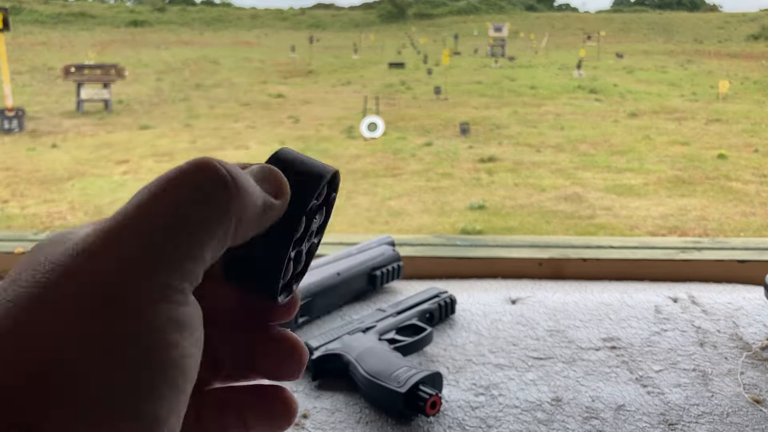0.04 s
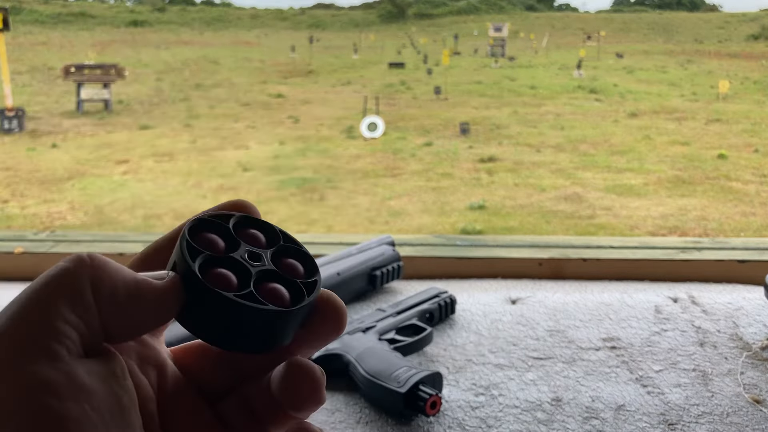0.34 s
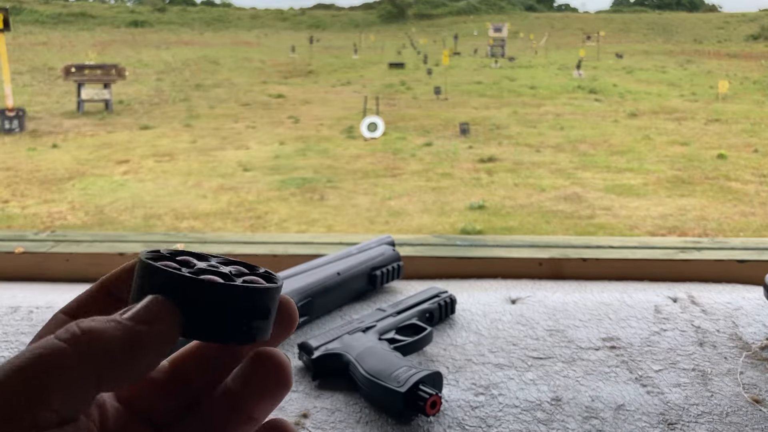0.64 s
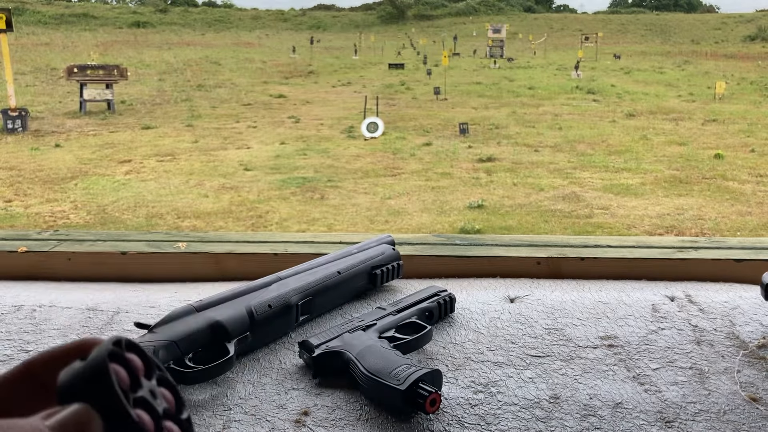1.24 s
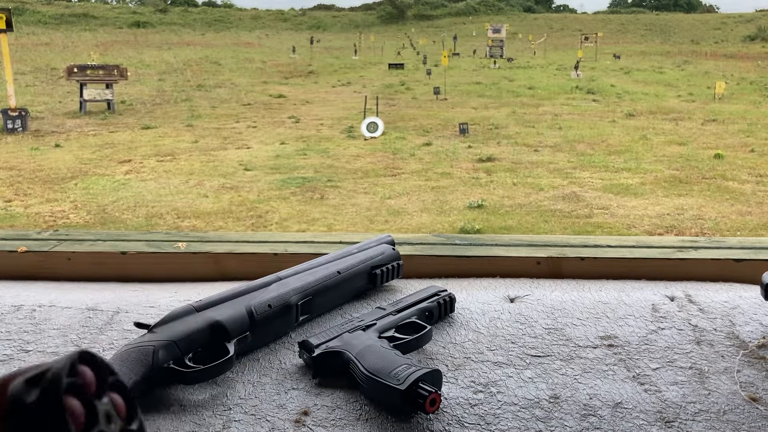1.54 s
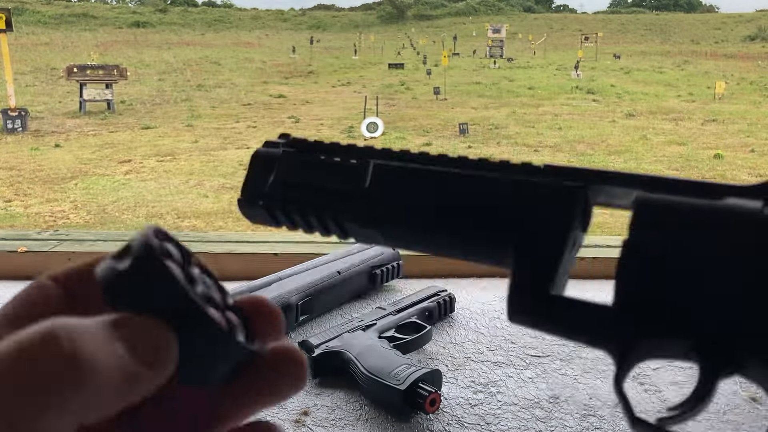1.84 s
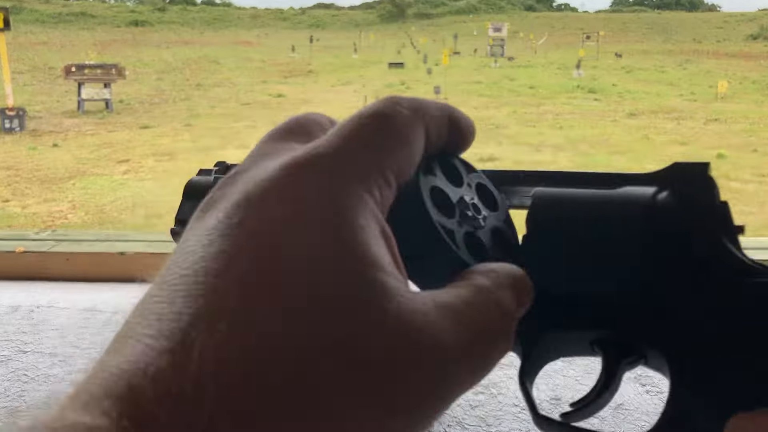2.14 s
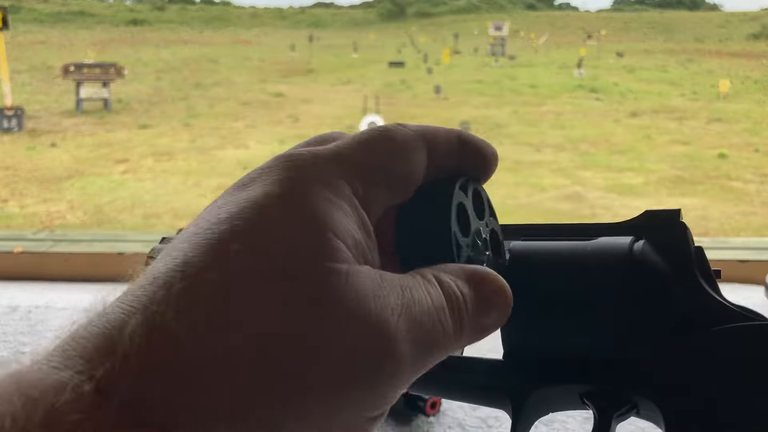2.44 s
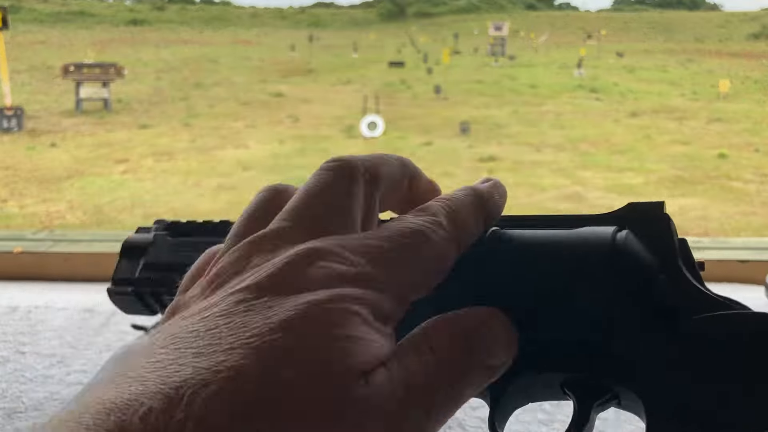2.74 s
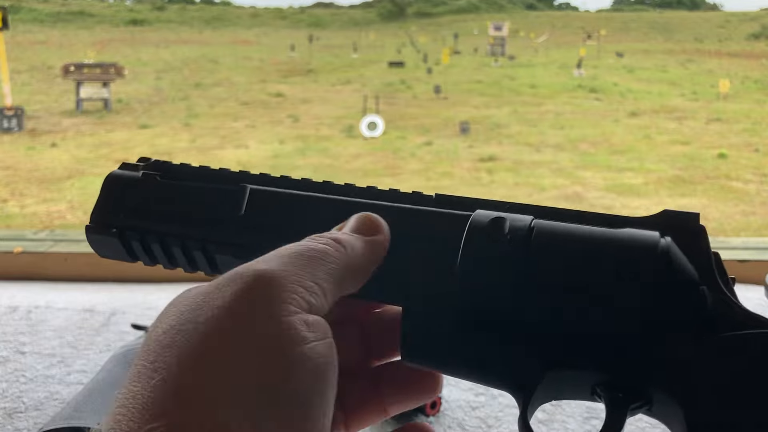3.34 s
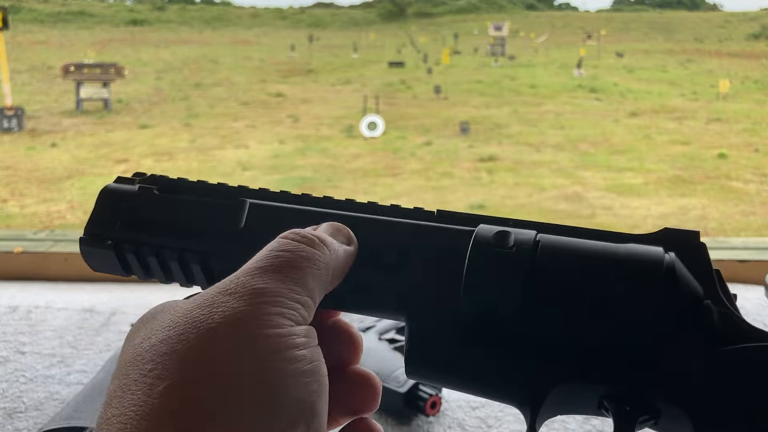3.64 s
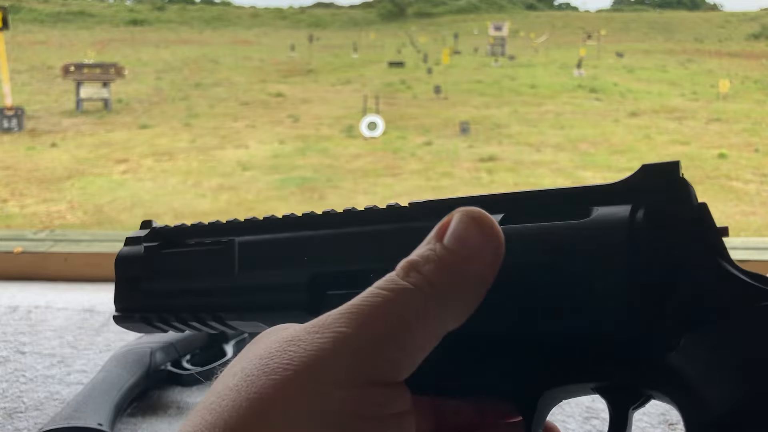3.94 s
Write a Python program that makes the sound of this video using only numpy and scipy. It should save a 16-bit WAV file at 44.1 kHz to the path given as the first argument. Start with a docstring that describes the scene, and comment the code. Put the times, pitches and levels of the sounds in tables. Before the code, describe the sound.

Close metallic clacks of a revolver being loaded at a sheltered outdoor range. First the gun rubs over carpet with dull bumps, then the cylinder rattles in and seats, and finally a latch snaps sharply. Faint wind touches the microphone.

```python
"""Revolver dragged off a range bench

Close up, a revolver rubs over the carpeted bench of a roofed outdoor range. Its loaded cylinder knocks
and scrapes into the frame and seats; a thumb slides along the barrel; a sprung latch snaps shut.
Blows are noise cracks plus damped modes; friction is many tiny slips over hiss.
The roof answers briefly; light wind bumps the microphone, birds chirp far off."""
import sys
import numpy as np
from scipy import signal
from scipy.fft import rfft, irfft
from scipy.io import wavfile
from scipy.ndimage import uniform_filter1d

SR = 44100
rng = np.random.default_rng(int(sys.argv[2]) if len(sys.argv) > 2 else 0)


def inscribe(sig):
    """Save sig as 16-bit PCM at rate SR to the path in sys.argv[1].

    A 1-D sig is mono; a 2-D sig holds one channel per row.
    Samples are clipped to [-1, 1] before scaling.
    """
    pcm = np.round(np.clip(np.atleast_2d(sig).T, -1, 1) * 32767)
    wavfile.write(sys.argv[1], SR, pcm.astype(np.int16))


N = 176400
BIN_HZ = np.fft.rfftfreq(N, 1 / SR)

# blow band centres: f/Hz
BANDS_HZ = [350, 750, 1400, 3000, 7000, 12000]
# blows: t/s, low and high f/Hz favoured by the contact point, level/dB per band
CYLINDER_KNOCKS = [(1.138, 1300, 1860, -86, -58, -53, -66, -71, -62),
                   (1.372, 725, 1340, -41, -64, -48, -90, -70, -70),
                   (2.1511, 898, 3020, -35.5, -19.5, -23, -20, -34, -43),
                   (2.2462, 810, 1570, -45.5, -40.5, -31.5, -35.5, -46, -45.5),
                   (2.3116, 1637, 4517, -57.5, -39, -34.5, -39.5, -52.5, -53),
                   (2.3248, 906, 1167, -51, -49, -41.5, -61, -68, -73),
                   (2.4208, 1110, 1210, -48.5, -33.5, -28.5, -41, -72, -71),
                   (2.5203, 1260, 1620, -64.5, -48.5, -31.5, -39.5, -46, -53),
                   (2.583, 950, 1740, -55.5, -46, -48.5, -60, -71, -76),
                   (2.6056, 910, 1780, -58, -35, -32, -38.5, -57.5, -48.5),
                   (2.6127, 610, 1300, -40, -33.5, -40, -45, -62.5, -47),
                   (2.6265, 1410, 2700, -47.5, -40, -37.5, -38, -56, -52.5),
                   (2.6342, 926, 3720, -50, -31, -26, -37, -48.5, -42.5),
                   (2.642, 674, 1052, -37, -20, -24.5, -38.5, -51, -46),
                   (2.7195, 840, 1580, -51.5, -38.5, -35.5, -47, -47.5, -44),
                   (2.7318, 886, 1540, -55.5, -28.5, -31, -33.5, -43, -46.5),
                   (2.7491, 1380, 7440, -55.5, -23.5, -21.5, -38, -24.5, -22),
                   (2.7528, 1283, 2895, -47, -35, -27.5, -17.5, -39, -32.5),
                   (3.091, 1280, 2640, -82, -43.5, -32, -39.5, -47, -36),
                   (3.0995, 1030, 2480, -67.5, -45.5, -35.5, -31.5, -78, -58),
                   (3.135, 910, 1406, -73, -62, -40, -60, -72, -55)]
LATCH_STRIKES = [(3.6598, 1520, 3780, -52, -34, -22, -21, -19, -21),
                 (3.6647, 1700, 2840, -48, -30, -22, -24, -22, -23),
                 (3.6692, 1600, 7730, -48, -38, -33, -31, -31, -38),
                 (3.6721, 1500, 2380, -46, -33, -24, -28, -26, -26),
                 (3.6745, 740, 1400, -38, -28, -30, -35, -44, -46),
                 (3.6875, 1460, 2060, -60, -50, -40, -45, -51, -50)]
# struck modes: f/Hz, level/dB, t60/s
FRAME_MODES = [(346, -3.5, 0.051), (636, -9.5, 0.061), (759, 5, 0.015), (1077, 4.5, 0.013),
               (1401, 0.5, 0.015), (1740, -9.5, 0.033), (2298, -6.5, .022), (3510, -7, 0.014),
               (4560, -7, 0.016), (7670, 1, 0.014), (10900, 1.5, 0.019)]
LATCH_MODES = [(740, -8, .022), (1350, -5, .02), (1521, -3, .02), (1695, -4, .02), (2062, -3, .025),
               (2383, -5, .025), (6563, -6, .014), (7736, -2, .02), (9400, -1, .014), (10600, -3, .016)]
# rubbed modes: f/Hz, width/Hz, level/dB
BOARD_MODES = [(143, 43, -9), (208, 35, 3), (318, 72, -2.5), (532, 11, 0.5)]
RASP_MODES = [(1702, 270, -11.5), (3920, 520, 2.5), (4500, 240, -8.5)]
# envelopes: t/s, level/dB
SCRAPE_ENV_DB = [(2.13, -74), (2.16, -39.5), (2.23, -57), (2.27, -45.5), (2.32, -65.5), (2.4, -63.5),
                 (2.415, -45), (2.46, -49), (2.483, -41.5), (2.495, -52), (2.515, -34), (2.535, -53.5),
                 (2.57, -58), (2.60, -44), (2.62, -53), (2.635, -30), (2.67, -36.5), (2.695, -51),
                 (2.715, -46), (2.755, -24), (2.78, -45), (2.895, -69), (2.905, -47.5), (2.97, -70),
                 (3.075, -67), (3.1, -31.5), (3.125, -49), (3.165, -53), (3.195, -46.5), (3.23, -58),
                 (3.3, -64), (3.62, -62.5), (3.649, -52.5), (3.657, -23), (3.68, -51)]
CARPET_ENV_DB = [(.91, -89), (.955, -62.5), (1.0, -56), (1.06, -51), (1.11, -72), (1.16, -58.5),
                 (1.205, -60.5), (1.215, -46), (1.235, -48.5), (1.255, -65.5), (1.277, -68), (1.285, -46),
                 (1.325, -48.5), (1.36, -40), (1.46, -43.5), (1.56, -51), (1.61, -58.5), (1.65, -50),
                 (1.70, -49.5), (1.76, -62), (1.83, -78), (1.89, -66), (2.02, -78)]
BOARD_ENV_DB = [(.95, -83), (1.02, -56), (1.12, -72.5), (1.27, -57), (1.35, -45), (1.5, -52), (1.8, -75)]
RASP_ENV_DB = [(.45, -88), (.54, -71.5), (.62, -89), (.92, -79), (0.999, -51), (1.06, -56.5), (1.12, -86)]
WIND_ENV_DB = [(0, -40), (.055, -48), (.12, -46.5), (.21, -69), (.47, -55), (.58, -65.5), (.65, -59),
               (.75, -66.5), (1.2, -61.5), (1.38, -45.5), (1.82, -61.5), (2.1, -53.5), (2.45, -59),
               (3.1, -55), (3.22, -61.5), (3.65, -63), (3.77, -86), (4, -61)]
AIR_ENV_DB = [(0, -68.5), (.3, -65), (.5, -72), (.85, -78), (1.4, -62.5), (2.05, -66), (3.05, -62.5),
              (3.25, -58), (3.62, -65), (3.8, -75), (4, -67.5)]
# noise spectra: f/Hz, relative density/dB
SCRAPE_SPECTRUM = [(60, -16.5), (250, -12), (500, -7), (900, 2.5), (1500, 3.5), (2500, -2), (4000, -3),
                   (5500, -14), (8000, -14.5), (11000, -12), (15500, -29), (16500, -46.5)]
CARPET_SPECTRUM = [(40, -5), (120, -4.5), (250, -2), (500, -22.5), (900, -4.5), (1500, -7), (2500, -10.5),
                   (4000, -7.5), (5500, -10.5), (8000, -9.5), (11000, -10), (15500, -16), (16500, -16.5)]
SKIN_SPECTRUM = [(100, -19.5), (500, -16), (1500, 0.5), (2500, -2), (4000, -1), (6000, -3), (8000, -0.5),
                 (11000, 8.5), (15500, 1.5), (16500, -38.5)]
WIND_SPECTRUM = [(15, -22.5), (28, -13.5), (50, 5.5), (90, 2.5), (140, -8.5), (220, -21.5), (450, -44.5),
                 (1500, -51)]
AIR_SPECTRUM = [(30, 5.5), (250, 2), (480, -0.5), (750, -7.5), (1130, -5.5), (1400, -12), (1900, -7.5),
                (2500, -15.5), (3900, -18), (4500, -11), (5400, -27.5), (16000, -24.5)]
# skin on cylinder and barrel: t/s, rise/s, hold/s, release/s, level/dB
THUMB_STROKES = [(0.205, 0.026, 0.0083, 0.018, -74.5), (0.511, 0.016, 0.0073, 0.026, -74),
                 (1.618, 0.027, 0.028, 0.14, -58.5), (3.261, 0.056, 0.029, 0.12, -48.5),
                 (3.42, 0.079, 0.31, 0.043, -72.5), (3.842, 0.12, 0.012, 0.14, -49.5)]
# snags: t/s, relative level/dB
SNAGS = [(.334, -69), (.949, -56), (.9945, -44), (1.138, -51), (1.2805, -45), (1.349, -43), (2.9015, -55),
         (3.0875, -46)]
# hand and grip thuds: t/s, f/Hz, level/dB, t60/s
BUMPS = [(1.282, 81, -31, 0.19), (1.345, 224, -36, 0.22), (1.366, 98.4, -44, 0.26),
         (2.901, 323, -37.5, 0.12), (2.935, 187, -43, 0.23), (3.097, 123, -24.5, 0.047)]
# bird chirps: t/s, start f/Hz, level/dB
CHIRPS = [(.445, 2170, -79), (.865, 2120, -82), (2.822, 2490, -62)]
# hand, bench and roof echoes: delay/s, level/dB
ECHOES = [(.0024, -17.5), (.0088, -24), (0.0161, -32.5), (0.036, -29)]
# diffuse tail: f/Hz, t60/s
TAIL_T60_S = [(200, 0.1), (1000, 0.4), (4000, 0.33), (12000, .22)]
# stereo side against mid: f/Hz, level/dB
SIDE_DB = [(40, -10), (150, -14), (600, -3), (1500, -3), (3000, 3.5), (5000, 3), (7000, -6.5), (16000, -56)]
# left microphone's phase lead: f/Hz, phase/rad
LEFT_LEAD_RAD = [(0, 0), (3500, .4), (7400, -.1), (9000, -3.1), (13700, -9.4), (15300, -12.6)]
# left boost and equal right cut: f/Hz, level/dB
TILT_DB = [(100, 0), (700, -.4), (1400, 1.5), (3000, .5), (6000, -.5), (14000, 0)]


def blow(focus_hz, band_db, modes, crack_db, crack_s, onset, size=4096):
    """A contact crack, the modes it rings and loose parts chattering; the contact weights each band."""
    spread_db = 5.5  # each blow lands elsewhere on the body
    chatter_db, focus_gain, focus_q = -17, 1.7, 7
    t = np.arange(size - onset) / SR
    ring = unit(sum(amp(db + rng.normal(0, spread_db) - 60 * t / t60) * np.sin(2 * np.pi * hz * t)
                    for hz, db, t60 in modes))
    crack = amp(crack_db) * burst(t, crack_s)
    chatter = amp(chatter_db) * burst(t, decay_s=0.008)
    z = rfft(np.pad(ring + crack + chatter, ((0, 0), (onset, 0))))
    hz = np.fft.rfftfreq(size, 1 / SR)
    z *= hz ** 2 / (hz ** 2 + 220 ** 2) / (1 + (hz / 14500) ** 8)  # band-pass
    z *= 1 + sum(focus_gain / (1 + 1j * focus_q * (hz / f - f / (hz + 1))) for f in focus_hz)
    masks = [log_interp(list(zip(BANDS_HZ, one)), hz) for one in np.eye(len(BANDS_HZ))]
    bands = (amp(db) * unit(irfft(z * mask)) for db, mask in zip(band_db, masks))
    return sum(bands) * np.sqrt(.005 * SR)  # band levels as rms over 5 ms


def blows(rows, modes, crack_db, crack_s):
    """A series of blows on one steel body."""
    out, onset = np.zeros((2, N)), 256  # samples of room for filter pre-ring
    for s, low_hz, high_hz, *band_db in rows:
        add(out, s - onset / SR, blow((low_hz, high_hz), band_db, modes, crack_db, crack_s, onset))
    return out


def cylinder_scrape():
    """The cylinder slips along the frame."""
    rub = friction(SCRAPE_SPECTRUM, slips_per_s=990, spread_db=-1, hiss=1.0, flutter_db=1.6)
    return envelope(SCRAPE_ENV_DB) * rub


def bench_drag():
    """The gun rubs the carpet; boards resonate below, hard edges rasp on skin and pile."""
    rub = friction(CARPET_SPECTRUM, slips_per_s=2600, spread_db=1.5, hiss=.75, flutter_db=1.0)
    boards = rubbed_modes(BOARD_MODES, BOARD_ENV_DB)
    rasp = rubbed_modes(RASP_MODES, RASP_ENV_DB)
    return envelope(CARPET_ENV_DB) * rub + boards + rasp


def friction(spectrum, slips_per_s, spread_db, hiss, flutter_db):
    """Tiny unequal slips over smooth hiss, clumping as the pressure varies."""
    slipping = rng.random(N) < slips_per_s / SR
    sizes = amp(spread_db * np.minimum(rng.exponential(1, N), 4))
    slips = unit(slipping * sizes * noise(N))
    pressure = amp(flutter_db * wander(N, size=200))
    rub = (slips + hiss * unit(noise(N))) * pressure
    return flicker(coloured(rub, spectrum), depth_db=2.4)


def rubbed_modes(modes, env_db, slips_per_s=900):
    """Small slips keep a few resonances sounding."""
    slips = (rng.random(N) < slips_per_s / SR) * noise(N)
    body = sum(amp(db) / (1 + 1j * (BIN_HZ ** 2 - hz ** 2) / (width_hz * (BIN_HZ + 1)))
               for hz, width_hz, db in modes)
    return envelope(env_db) * unit(irfft(rfft(stereo(slips)) * body, N)) * np.sqrt(N)


def squeak(at_s=1.211, length_s=0.022, start_hz=929, rise_hz_per_s=6500, level_db=-48.5):
    """Stick-slip: one rising chirp as the gun starts to move."""
    out, t = np.zeros((2, N)), np.arange(0, length_s, 1 / SR)
    hz = (start_hz + rise_hz_per_s * t) * (1 + 0.099 * wander(len(t), size=40))
    swell = amp(level_db) * np.sqrt(2 * np.sin(np.pi * t / length_s))
    add(out, at_s, swell * tone(hz))
    return out


def snags():
    """Fibres and edges catch and let go."""
    out, t = np.zeros((2, N)), np.arange(512) / SR
    for s, db in SNAGS:
        add(out, s, 14 * amp(db) * burst(t, decay_s=0.0017))
    return out


def bumps(rise_s=0.0046, waver=0.23):
    """Hand-damped grip and bench give low, unsteady thuds."""
    out, t = np.zeros((2, N)), np.arange(SR // 2) / SR
    for s, hz, db, t60 in BUMPS:
        thud = tone(hz * (1 + waver * wander(len(t), size=120)))
        add(out, s, amp(db - 60 * t / t60) * (1 - np.exp(-t / rise_s)) * thud)
    return out


def thumb():
    """Dry skin hisses over the gun, swelling and fading with each stroke."""
    t, push = np.arange(N) / SR, np.zeros(N)
    for s, rise_s, hold_s, release_s, db in THUMB_STROKES:
        ramp = np.interp(t, s + np.cumsum([0, rise_s, hold_s, release_s]), [0, 1, 1, 0])
        push += amp(db) * np.sin(np.pi / 2 * ramp) ** 2
    return push * friction(SKIN_SPECTRUM, slips_per_s=58000, spread_db=12, hiss=1.7, flutter_db=1.55)


def shelter(x, build_s=0.0058, tail_db=-30):
    """Adds hand, bench and roof echoes and a short diffuse tail."""
    hz, t, z = signal.stft(stereo(noise(SR // 2)), SR, nperseg=256)
    decay = amp(-60 * t / log_interp(TAIL_T60_S, hz)[:, None])
    tail = signal.istft(z * decay * (1 - np.exp(-t / build_s)), SR, nperseg=256)[1]
    response = amp(tail_db) * unit(tail)
    for s, db in ECHOES:
        add(response, s, amp(db) * np.array([[.25, .5, .25]]))  # dulled reflection
    return x + signal.fftconvolve(x, response, axes=1)[:, :N]


def wind():
    """Low gusts on the microphone over the uneven hush of the field."""
    gusts = envelope(WIND_ENV_DB) * coloured(noise(N), WIND_SPECTRUM)
    hush = envelope(AIR_ENV_DB) * coloured(noise(N), AIR_SPECTRUM)
    return gusts + flicker(hush, depth_db=1.6)


def birds(length_s=.045, fall_hz_per_s=5800):
    """Distant falling chirps, each a tone and its octave."""
    out, t = np.zeros((2, N)), np.arange(0, length_s, 1 / SR)
    for s, start_hz, db in CHIRPS:
        hz = start_hz - fall_hz_per_s * t
        add(out, s, amp(db) * np.sin(np.pi * t / length_s) * (tone(hz) + tone(2 * hz)))
    return out


def amp(db):
    """dB to gain."""
    return 10 ** (np.asarray(db) / 20)


def unit(x):
    """Scales to mean energy 1 per channel."""
    return x / np.sqrt((x ** 2).sum(-1).mean() + 1e-20)


def log_interp(points, hz):
    """Table lookup on a log-frequency axis."""
    f, value = np.transpose(points)
    return np.interp(np.log(hz + 1), np.log(f + 1), value)


def envelope(points):
    """Gain from (t/s, level/dB) points, silent outside them."""
    s, db = np.transpose(points)
    return amp(np.interp(np.arange(N) / SR, s, db, left=-120, right=-120))


def add(mix, s, sound):
    """Mixes a sound in at time s."""
    part = mix[:, max(round(s * SR), 0):][:, :sound.shape[1]]
    part += sound[:, :part.shape[1]]


def tone(hz):
    """One-channel sine following a pitch track."""
    return np.sin(2 * np.pi * np.cumsum(hz) / SR)[None]


def noise(n):
    """Two independent white noises."""
    return rng.standard_normal((2, n))


def burst(t, decay_s):
    """Decaying stereo noise, energy 1."""
    return unit(stereo(noise(len(t))) * np.exp(-t / decay_s))


def wander(n, size):
    """Smooth random curve, rms 1."""
    smooth = uniform_filter1d(uniform_filter1d(rng.standard_normal(n), size), size)
    return unit(smooth) * np.sqrt(n)


def stereo(x):
    """Mid and side to left and right, alike in bass and top."""
    mid, side = rfft(x)
    width = amp(log_interp(SIDE_DB, np.fft.rfftfreq(x.shape[1], 1 / SR)))
    return irfft(np.array([mid + width * side, mid - width * side]) / np.sqrt(1 + width ** 2), x.shape[1])


def coloured(x, spectrum):
    """Stereo signal shaped by a spectrum, rms 1."""
    return unit(irfft(rfft(stereo(x)) * amp(log_interp(spectrum, BIN_HZ)), N)) * np.sqrt(N)


def flicker(x, depth_db):
    """Resonances come and go: random gain patches in frequency and time."""
    z = signal.stft(x, nperseg=512)[2]
    patches = rng.standard_normal(z.shape[1:])
    for axis in (0, 1, 0, 1):
        patches = uniform_filter1d(patches, size=7, axis=axis)
    return signal.istft(z * amp(depth_db * patches / patches.std()), nperseg=512)[1][:, :N]


def scene():
    """Gun and hands under the roof, open air behind."""
    knocks = blows(CYLINDER_KNOCKS, FRAME_MODES, crack_db=-0.5, crack_s=0.001)
    latch = blows(LATCH_STRIKES, LATCH_MODES, crack_db=9.5, crack_s=0.0022)  # strike and rebounds
    handling = bench_drag() + squeak() + cylinder_scrape() + snags() + bumps() + thumb()
    return shelter(knocks + latch + handling) + wind() + birds()


def record(dry, cutoff_hz=15900):
    """Microphone pair: level and phase tilt between the sides, then a low-pass."""
    left, right = rfft(dry)
    lead_rad = np.interp(BIN_HZ, *np.transpose(LEFT_LEAD_RAD))
    tilt = amp(log_interp(TILT_DB, BIN_HZ)) * np.exp(1j * lead_rad / 2)
    heard = irfft(np.array([left * tilt, right / tilt]), N)
    lowpass = signal.firwin(255, cutoff_hz, window=("kaiser", 9), fs=SR)
    return signal.oaconvolve(heard, lowpass[None], "same", axes=1)


dry = scene()
out = record(dry)
inscribe(out)
```